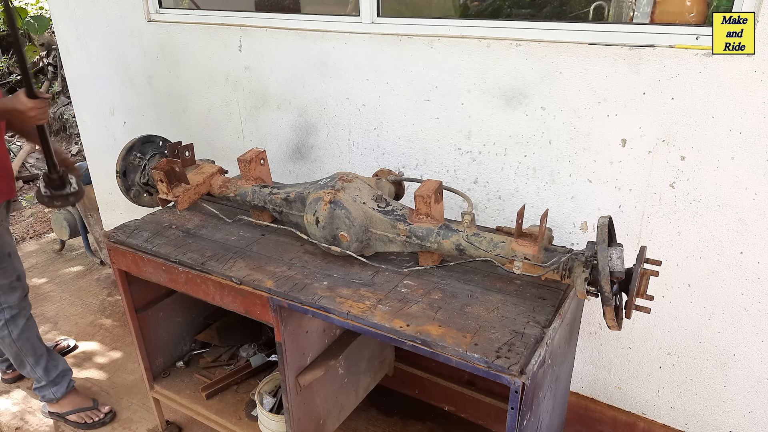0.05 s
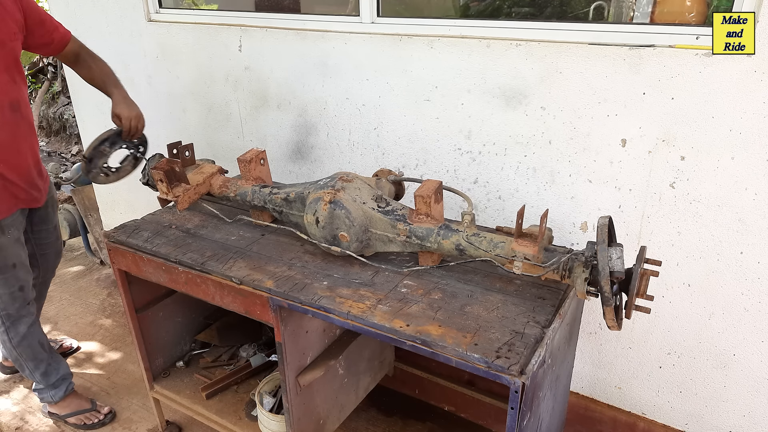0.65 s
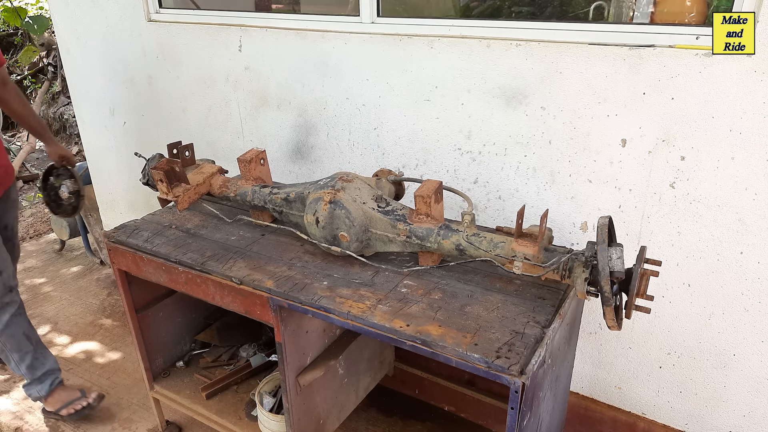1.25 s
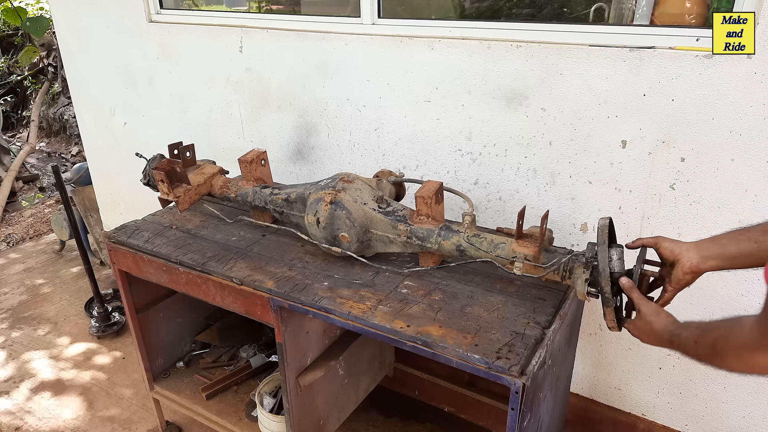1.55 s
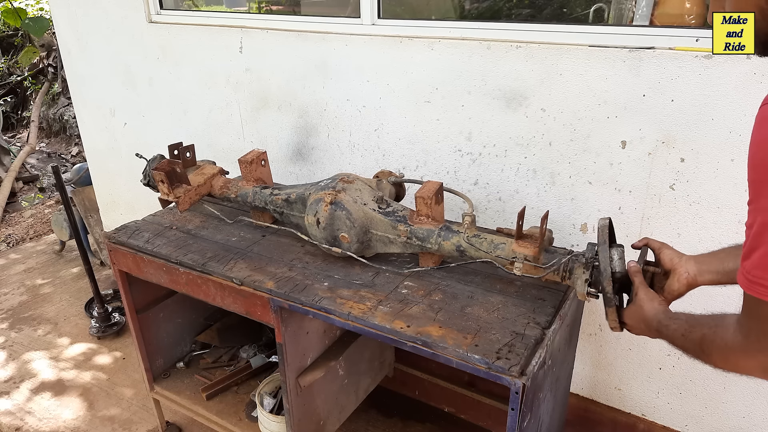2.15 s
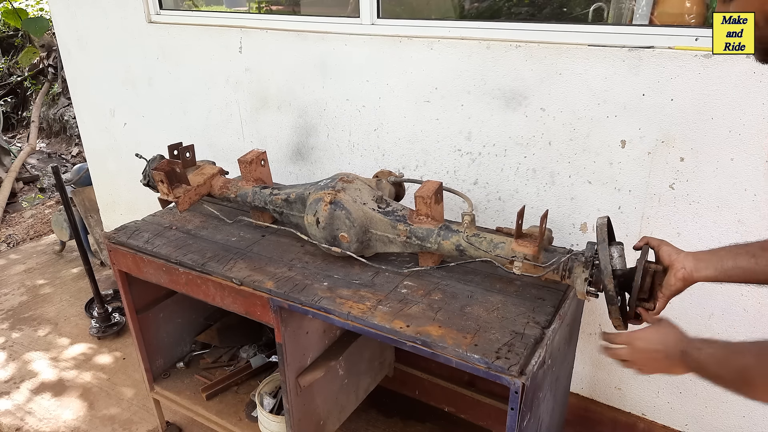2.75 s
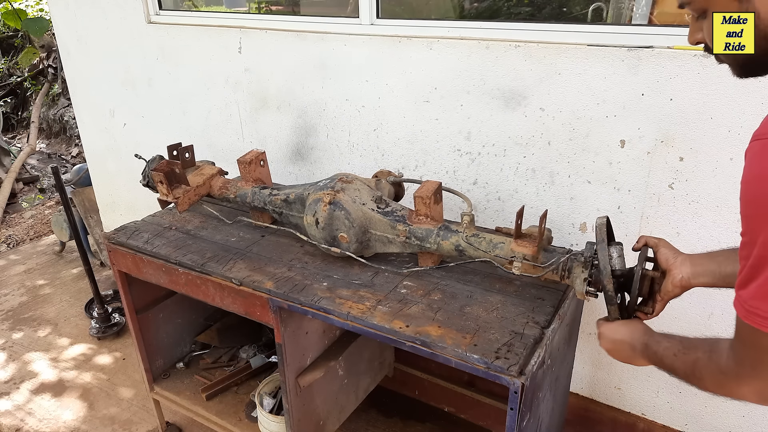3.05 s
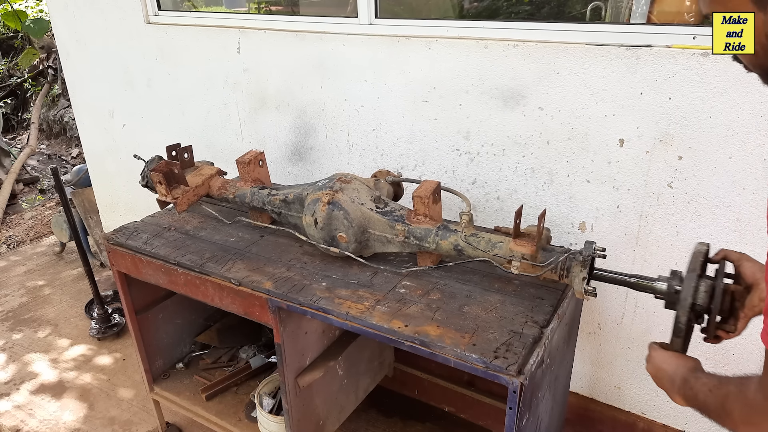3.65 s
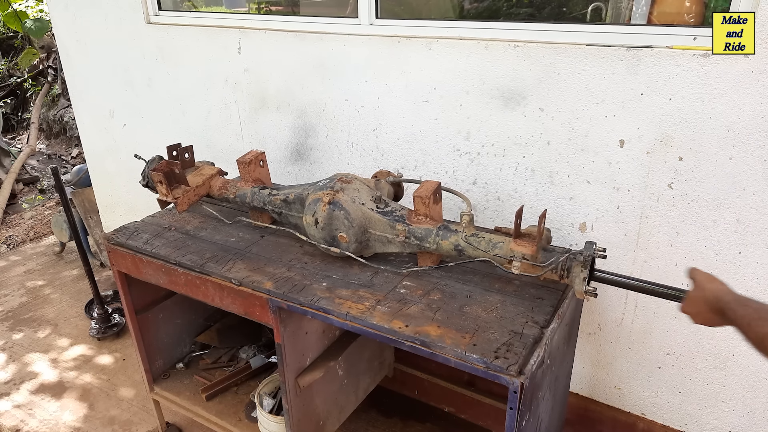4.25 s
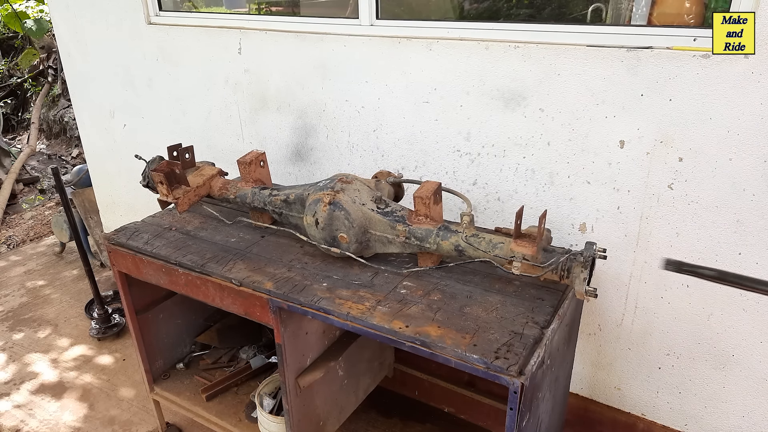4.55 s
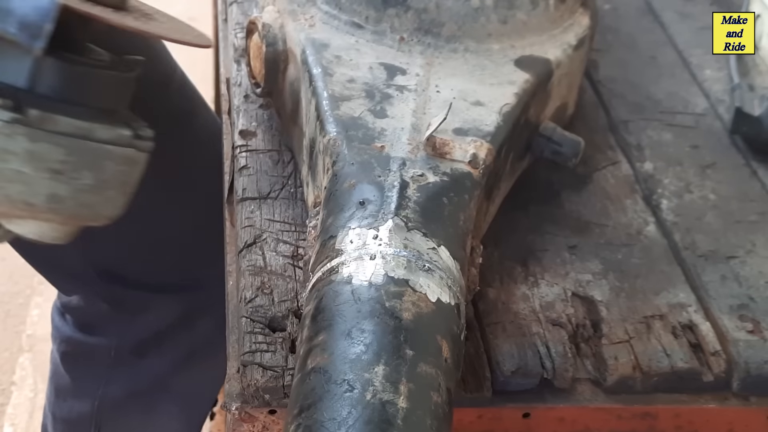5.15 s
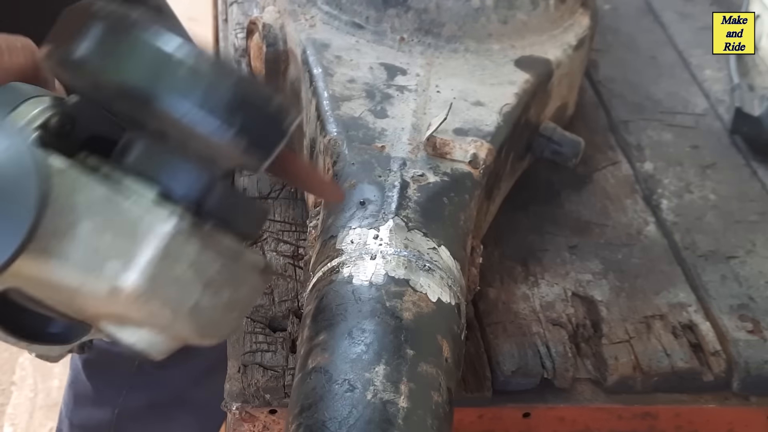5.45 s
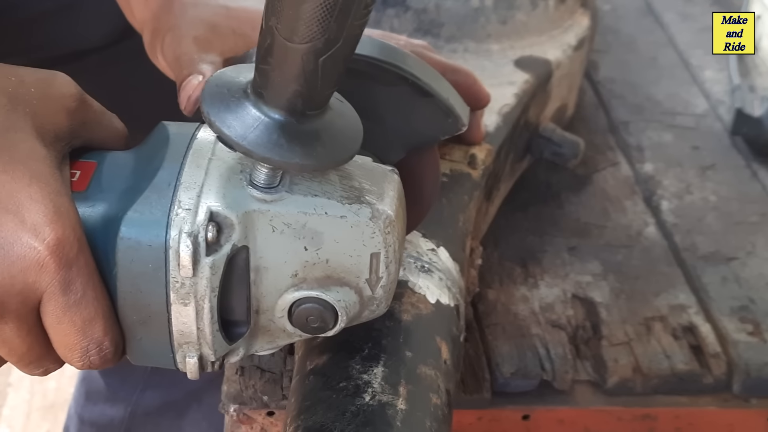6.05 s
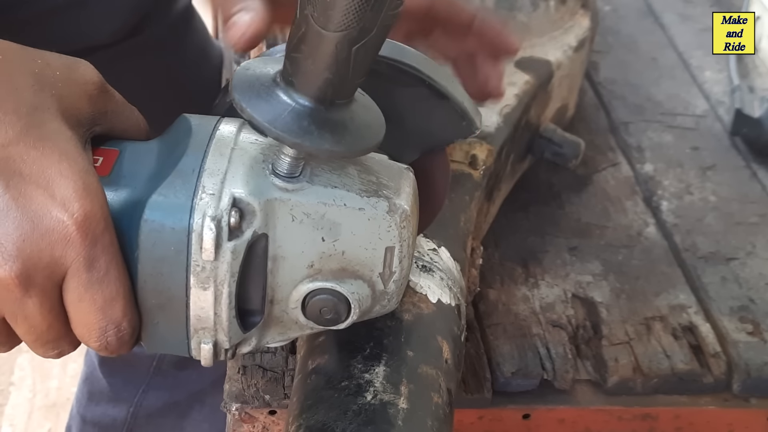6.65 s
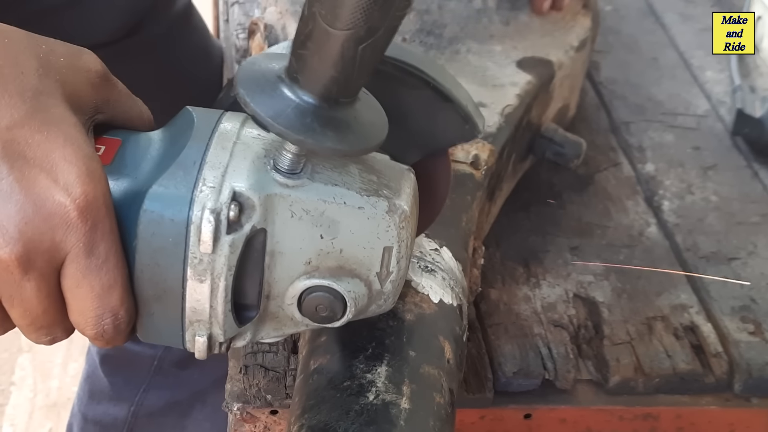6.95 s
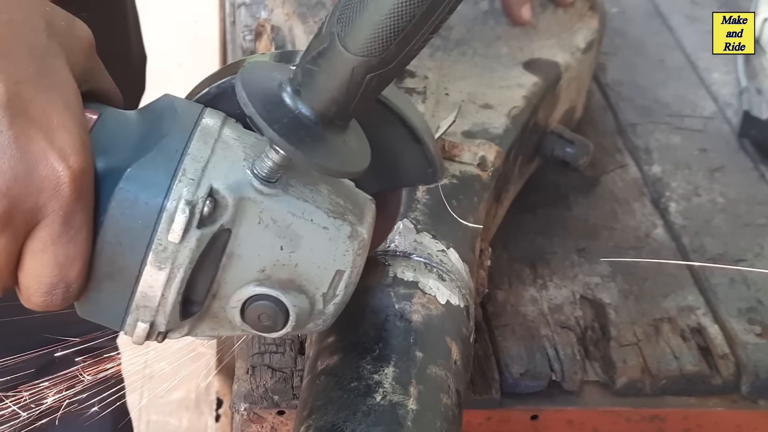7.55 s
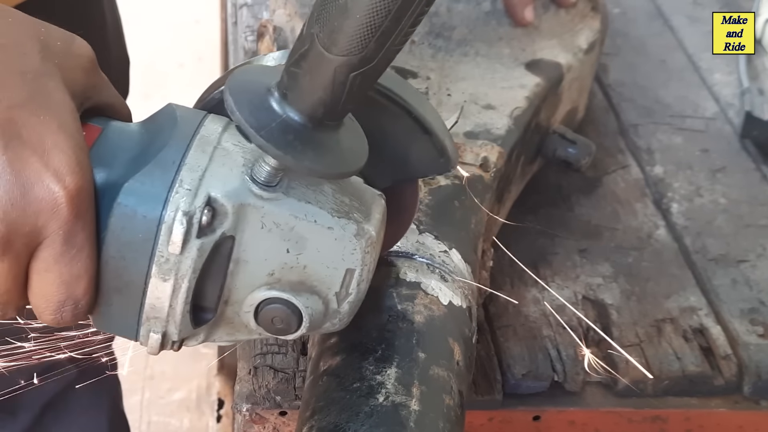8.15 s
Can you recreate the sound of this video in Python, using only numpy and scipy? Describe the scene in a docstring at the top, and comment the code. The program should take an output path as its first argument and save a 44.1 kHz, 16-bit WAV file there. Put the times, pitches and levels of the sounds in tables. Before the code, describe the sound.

Rusty steel parts clang and scrape outdoors while a bird squawks, then a close angle grinder spins up and screeches against steel.

```python
"""Over the hush and low hum of a yard, grit scuffs and a brake drum jolts off a rusty rear axle, ringing.
A bird starts squawking in the trees. Steel blows knock the half-shaft loose, clanging through the hollow
housing, and the shaft judders out along its tube. At five seconds the yard drops away and, close by, an
angle grinder spins up and runs free, fan rushing and gears whining. Its disc skips on the steel housing,
then bites and screeches in two squealing modes."""
import sys
import numpy as np
from scipy import signal
from scipy.fft import rfft, irfft, next_fast_len
from scipy.io import wavfile
from scipy.ndimage import map_coordinates

SR = 44100
rng = np.random.default_rng(int(sys.argv[2]) if len(sys.argv) > 2 else 0)


def bounce(signal):
    """Save signal as a 16-bit WAV file at the path given by the first command-line argument."""
    frames = np.transpose(np.atleast_2d(signal))
    limited = np.clip(frames, -1, 1)
    pcm = np.round(limited * 32767).astype(np.int16)
    wavfile.write(sys.argv[1], SR, pcm)


N = 370440

# colour of the yard air, the air at the bench and the grit: (frequency [Hz], density [dB])
YARD_AIR = [(25, -27), (55, -6.5), (100, -8.5), (145, -9), (200, -15.5), (463, -15), (1290, -23),
            (6000, -25.5), (12500, -35), (16000, -37)]
BENCH_AIR = [(25, -45), (110, -17), (1000, -42.5), (16000, -51.5)]
SCUFF_COLOUR = [(400, -11.5), (1500, -5.0), (6000, -7.5), (15000, -15.5)]
# low hum under the yard: (frequency [Hz], level [dB])
HUM_TONES = [(59.2, -56.5)]
# stereo image of air, blows and grinder: (frequency [Hz], left-right likeness [0-1])
AIR_IMAGE = [(240, 0.94), (950, 0.13), (4000, 0.039)]
BLOW_IMAGE = [(200, 1), (1000, 0.77), (5000, 0.099)]
TOOL_IMAGE = [(380, 0.99), (950, 0.46), (2400, 0.52), (6000, 0.097)]
# gritty scuffs: (time [s], length [s], level [dB])
SCUFF_STROKES = [(0.439, 0.0067, -48), (0.521, 0.025, -43), (0.971, 0.016, -52), (1.248, 0.37, -57.5),
                 (2.495, 0.33, -50.5), (3.222, 0.018, -34), (4.46, 0.0088, -56), (4.505, 0.15, -48),
                 (4.713, 0.056, -43.5)]

# the drum jolting off its studs, then a low thud and the blows on the axle, ahead of a common trim: (time [s],
# knock [dB], clang [dB], clink [dB], brightest ring [Hz])
DRUM_JOLTS = [(0.527, -22.5, -20.5, -32, 1210), (0.542, -29, -22.5, -27.5, 1500),
              (0.557, -24.5, -22.5, -36, 2250), (0.570, -34, -44, -33, 1000)]
AXLE_BLOWS = [(1.412, -40.5, -50.5, -53.5, 140), (1.970, -27, -29.5, -36, 1000),
              (2.274, -19.5, -13, -22.5, 1930), (2.39, -24.5, -24, -42, 1107),
              (2.454, -28, -28.5, -44.5, 900), (2.525, -33, -29, -34.5, 1490),
              (2.634, -32.5, -27.5, -37.5, 1110), (2.778, -36, -30, -45, 1010),
              (3.221, -26.5, -18, -27.5, 1093), (3.253, -22, -17, -14, 4360),
              (3.331, -36, -24.5, -36, 2800), (3.359, -28, -8.5, -11, 1920), (3.375, -25, -9, -17, 2596),
              (3.567, -21, -18, -33, 895), (3.593, -37, -29.5, -32.5, 2500), (4.075, -42, -44, -58, 1500)]
# ring of the brake drum and the backing plate: (frequency [Hz], relative level [dB], t60 [s])
DRUM_MODES = [(428, -8, 0.44), (495, -3, 0.38), (1062, -3.5, 0.11), (1500, 2, 0.045), (1825, -22, 0.35),
              (2114, -11, 0.13), (2487, -4, 0.069), (4880, -14, 0.03)]
PLATE_MODES = [(1026, -17, 0.11), (1295, -1, 0.24), (1830, 0, 0.37), (1856, -6, 0.16), (1950, 0, 0.22),
               (2420, 6.5, 0.11), (2460, -6, 0.39), (3230, -0.5, 0.19), (3734, -7.5, 0.068),
               (5616, 5, 0.112)]
# colour of a blow's dense ring, its opening crack and rubbed steel: (frequency [Hz], density [dB])
CLANK_COLOUR = [(41, -58), (70, -20.5), (145, -8), (500, -6.5), (892, -7.5), (1610, -11), (2500, -15),
                (5750, -25), (16000, -43)]
CRACK_COLOUR = [(300, -12.0), (2000, -8.0), (15000, -29.5)]
RUB_COLOUR = [(500, -3.5), (6000, -7.5)]
# decay of the dense ring: (frequency [Hz], t60 [s])
CLANK_DECAY = [(130, 0.42), (500, 0.31), (1500, 0.15), (8000, 0.13)]
# body of the hollow axle housing and the rubbed half-shaft: (frequency [Hz], width [Hz], gain [dB])
HOUSING_PEAKS = [(148.4, 22, 7.5), (478.5, 45, 4), (883, 40, -8), (2046, 13, -7.5)]
SHAFT_PEAKS = [(488, 52, 5), (563, 67, 2.5), (940, 87, 0), (1814, 90, -6.5), (3760, 33, -5),
               (5970, 50, -11.5)]
# bird calls: (time [s], length [s], starting pitch [Hz], level [dB])
BIRD_CALLS = [(1.62, 0.12, 2900, -70), (2.0, 0.087, 2780, -55), (2.895, 0.079, 2880, -51),
              (2.943, 0.13, 3075, -44.5), (3.007, 0.081, 3160, -43), (3.778, 0.12, 3265, -46.5),
              (4.619, 0.11, 3110, -45.5), (4.741, 0.13, 3020, -50)]
# the bird's voice: (harmonic [number], gain [dB])
BIRD_HARMONICS = [(1, -11.5), (2, -2.0), (3, -21.5), (4, -22.0)]
# pulls on the half-shaft: (time [s], length [s], level [dB])
SHAFT_PULLS = [(1.962, 0.041, -30), (2.247, 0.54, -34), (2.951, 0.069, -34.5), (3.195, 0.073, -26.5),
               (3.806, 0.076, -25), (3.943, 0.286, -40.5)]

# the gears take up their slack in two jerks: (time from the switch [s], gain [0-1])
GEAR_SLACK = [(-0.008, 0.0026), (-0.01, 0.25), (.001, 0.84), (0.02, 0.46), (0.0036, 1)]
# colour of the fan rush and the grinding grit: (frequency [Hz], density [dB])
FAN_COLOUR = [(35, -57), (60, -40), (136, -29), (822, -7.5), (1200, -8), (2050, -3), (2800, -.5),
              (5090, -5.5), (6140, -2.5), (10000, -7), (16000, -19)]
GRIT_COLOUR = [(200, 6.5), (15000, -1.5)]
# body of the gearcase and the sheet guard: (frequency [Hz], width [Hz], gain [dB])
GEARCASE_PEAKS = [(2006, 116, 3), (2870, 370, 1), (3900, 180, 6.5), (5570, 136, 8), (8150, 500, -11.5)]
GUARD_PEAKS = [(1314, 92, 6), (2180, 310, 3)]
# gear and bearing tones, each swelling as it sweeps through a resonance:
# (order [x disc speed], level [dB], resonance [Hz], width [Hz], roughness [rad])
GEAR_TONES = [(4.016, -38.5, 650, 380, 0.4), (8.1, -39, 1670, 110, 0.37), (26.9, -37.5, 5400, 230, 0.58),
              (29.6, -29.5, 6210, 210, 0.39), (36.5, -20, 4500, 1700, 5.7), (41.1, -33.5, 8300, 980, 0.69),
              (58.2, -31, 11430, 570, .8)]
# the close tool's balance: (frequency [Hz], left minus right [dB])
TOOL_BALANCE = [(150, 1), (380, -2), (950, 0), (2380, 2.5), (5980, 2), (15000, -16)]
# the disc skims, bites, then leans in: (time [s], settling [s], pressure [0-1], speed [turns/s])
DISC_CONTACTS = [(6.66, 0.28, 0.43, 202), (7.526, 0.015, 0.48, 205.4), (7.948, .45, 0.68, 203)]
# the lightly held disc skips on the steel: (time [s], level [dB])
DISC_SKIPS = [(6.876, -19.5), (6.961, -19.5), (7.011, -22), (7.053, -19), (7.1, -19.5), (7.15, -21.5),
              (7.198, -18.5), (7.25, -23.5), (7.293, -19.5), (7.35, -19), (7.402, -18.5), (7.433, -25.5),
              (7.453, -16.5)]
# ring of the disc skipping and grinding on the housing: (frequency [Hz], width [Hz], gain [dB])
SKIP_PEAKS = [(3050, 400, -5.5), (4290, 280, 1.5), (5560, 420, -6)]
GRIND_PEAKS = [(288, 68, -19), (993, 423, -19.5), (4050, 800, -6.5), (5780, 260, -7)]
# the disc's two squealing modes: (frequency [Hz], width [Hz])
SQUEAL_MODES = [(2975, 170), (4216, 130)]
# how strongly each squeals: (time [s], lower mode [dB], upper mode [dB])
SQUEAL_LEVELS = [(7.526, -37, -24.5), (7.58, -33, -21), (7.65, -27, -22.5), (7.79, -25.5, -27),
                 (7.92, -24.5, -22), (8.01, -32, -29), (8.055, -25.5, -21), (8.10, -30.5, -31),
                 (8.4, -30, -31)]
# gears under load: (order [x disc speed], level [dB])
GROAN_TONES = [(3.76, -47), (7.519, -46.5)]

CLOSE_S, SWITCH_S = 5.0, 5.328  # the cut to the bench; the grinder switches on
FREE_SPEED, KICK_SPEED = 211, 96  # disc turns a second: running free, just after the switch


def amp(db):
    """Decibels to gain."""
    return 10 ** (np.asarray(db) / 20)


def unit(x):
    """x at rms 1."""
    return x / np.sqrt(np.mean(x ** 2) + 1e-20)


def along(points, hz):
    """(Hz, value) points read on a log axis."""
    f, v = np.transpose(points)
    return np.interp(np.log(hz + 1), np.log(f + 1), v)


def clock():
    """The time of every sample."""
    return np.arange(N) / SR


def wobble(rate):
    """A smooth random curve, rate knots a second."""
    return map_coordinates(rng.standard_normal(int(N * rate / SR) + 4), [np.arange(N) * rate / SR])


def filtered(x, response):
    """x times a complex response of frequency."""
    n = x.shape[-1]
    m = next_fast_len(n + 8192)
    return irfft(rfft(x, m) * response(np.fft.rfftfreq(m, 1 / SR)), m)[..., :n]


def resonate(x, peaks):
    """x through (Hz, width, dB) resonances of alternating polarity."""
    return filtered(x, lambda f: sum((-1) ** k * amp(db) * 1j * f * w / (c * c - f * f + 1j * f * w)
                                     for k, (c, w, db) in enumerate(peaks)))


def band(x, lo_hz, hi_hz):
    """Causal band-pass."""
    return signal.sosfilt(signal.butter(3, [lo_hz, hi_hz], 'band', fs=SR, output='sos'), x)


def noise(colour, image, size=N):
    """Coloured stereo noise of rms 1."""
    def mid_side(hz):
        spread = np.arccos(along(image, hz)) / 2
        return amp(along(colour, hz)) * [np.cos(spread), np.sin(spread)]
    mid, side = filtered(rng.standard_normal((2, size)), mid_side)
    return unit(np.array([mid + side, mid - side]))


def pan(db):
    """Channel gains for a left minus right level."""
    return amp([[db / 2], [-db / 2]])


def echo(x, t60, wet_db):
    """x with a diffuse tail from walls and trees."""
    t = np.arange(SR) / SR
    tail = rng.standard_normal((2, SR)) * amp(-60 * t / t60)
    wet = signal.fftconvolve(np.atleast_2d(x), tail / np.linalg.norm(tail[0]), axes=1)[:, :N]
    return x + amp(wet_db) * wet


def nearby(x, t60, wet_db):
    """Bench top, housing and hands reflect within milliseconds and comb the sound."""
    t = np.arange(SR // 40) / SR
    paths = rng.standard_normal((2, len(t))) * amp(-60 * t / t60) * (t > .001)
    wet = signal.fftconvolve(x, paths / np.linalg.norm(paths[0]), axes=1)[:, :N]
    return (x + amp(wet_db) * wet) / np.hypot(1, amp(wet_db))


def air():
    """The bed: open-air hush with a low hum, giving way to quieter air at the bench."""
    t = clock()
    far = np.clip((CLOSE_S - t) / 0.0203, 0, 1)
    hum = sum(amp(db + 0.62 * wobble(5.2)) * np.sqrt(2) * np.sin(2 * np.pi * hz * t + 0.27 * wobble(5))
              for hz, db in HUM_TONES)
    yard = amp(-50 - 3.0 + 2.65 * wobble(3.1)) * noise(YARD_AIR, AIR_IMAGE) * pan(-5.0)
    return far * (yard + hum) + (1 - far) * amp(-57.0) * noise(BENCH_AIR, AIR_IMAGE)


def scuffs():
    """Grit rubbed in short strokes."""
    strokes = sum(amp(db) * np.exp(-(2 * (clock() - s) / length) ** 2) for s, length, db in SCUFF_STROKES)
    return strokes * unit(noise(SCUFF_COLOUR, AIR_IMAGE) * amp(3.9 * wobble(300)))


def clank(modes, ring_db, hollow_db, bright_hz):
    """One blow: a crack, a dense, quickly dying ring, the hollow housing and the part's clear modes."""
    t = np.arange(SR // 2) / SR
    # the point of contact favours one part of the ring
    focus_db = lambda f: 9.5 * np.exp(-(np.log2((f + 1) / bright_hz) / 0.41) ** 2)
    modes = [(f, db + focus_db(f), t60) for f, db, t60 in modes]
    hz, age, frames = signal.stft(noise(CLANK_COLOUR, BLOW_IMAGE, size=len(t)), SR, nperseg=256)
    decay = amp(focus_db(hz)[:, None] / 2 - 60 * age / along(CLANK_DECAY, hz)[:, None])
    dense = unit(signal.istft(frames * decay, SR)[1][:, :len(t)])
    ring = sum(amp(db + rng.normal(0, 1.0, (2, 1)) - 60 * t / t60)
               * np.sin(2 * np.pi * f * t + rng.uniform(0, 2 * np.pi)) for f, db, t60 in modes)
    # the loose part buzzes against its neighbour, which roughens each mode
    buzz = unit(resonate(dense, [(f, 70, db / 2 - along(CLANK_COLOUR, f)) for f, db, _ in modes]))
    steel = amp(ring_db) * (unit(ring) + amp(-6.0) * buzz)
    crack = amp(11.5) * np.exp(-t / 0.0026) * noise(CRACK_COLOUR, BLOW_IMAGE, size=len(t))
    hollow = amp(hollow_db) * unit(resonate(dense, HOUSING_PEAKS))
    return (crack + dense + steel + hollow) * (1 - np.exp(-t / 0.00012))


def blows(events, modes, ring_db, hollow_db, top_hz, heavy_db=-10.5, trim_db=-5.0):
    """Steel knocks on steel; each contact has its own blend of low knock, mid clang and high clink."""
    out = np.zeros((2, N + SR))
    for s, knock_db, clang_db, clink_db, bright_hz in events:
        woken_db = np.clip(clang_db - heavy_db, -15.5, 0)  # heavy blows wake the modes fully
        hit = clank(modes, ring_db + woken_db, hollow_db, bright_hz)
        layers = [(knock_db, 85, 700, 0.5), (clang_db, 700, 3500, -5), (clink_db, 3500, top_hz, -5)]
        for db, lo_hz, hi_hz, side_db in layers:
            layer = band(hit, lo_hz, hi_hz) * pan(side_db)
            attack_rms = layer[:, :SR // 40].std()
            out[:, round(s * SR):][:, :hit.shape[1]] += amp(db + trim_db) * layer / attack_rms
    return out[:, :N]


def bird(fall_hz_per_s=6500):
    """Hoarse falling squawks in the trees, strongest on the second harmonic."""
    t, out = clock(), np.zeros(N)
    hoarse = 1 + .028 * wobble(900) + .015 * wobble(90)
    for s, length, first_hz, db in BIRD_CALLS:
        on = (t > s) & (t < s + length)
        age = t[on] - s
        phase = 2 * np.pi * np.cumsum((first_hz - fall_hz_per_s * age) * hoarse[on]) / SR
        voice = sum(amp(level) * np.sin(k * phase) for k, level in BIRD_HARMONICS)
        out[on] += amp(db) * np.sin(np.pi * age / length) ** .5 * voice
    return echo(out, t60=0.503, wet_db=4.0)


def pulling(attack_s=0.021, release_s=0.036, tire_db_per_s=3):
    """Envelope of the rubbing: each pull takes hold, tires slowly and lets go."""
    effort = np.full(N, amp(-44.5))  # the shaft creeps between pulls
    for s, length, db in SHAFT_PULLS:
        age = np.maximum(clock() - s, 0)
        shape = np.minimum(age / attack_s, 1) * np.exp(-np.maximum(age - length, 0) / release_s)
        effort = np.maximum(effort, shape * amp(db - tire_db_per_s * age))
    return effort


def half_shaft():
    """The splined shaft judders along its tube and rings more freely the farther it is out."""
    catches = amp(4.5 * wobble(35))
    slips = noise(CLANK_COLOUR, BLOW_IMAGE) * catches
    tube = unit(unit(resonate(slips, HOUSING_PEAKS)) + unit(slips))
    rub = noise(RUB_COLOUR, BLOW_IMAGE) * amp(2.6 * wobble(70) + 4.6 * wobble(18))
    shaft = unit(resonate(rub, SHAFT_PEAKS))
    drawn = np.interp(clock(), [3.6, 4.1], [.25, .9])
    moving = np.interp(clock(), [1.96, 2, 4.28, 4.36], [0, 1, 1, 0])
    return moving * pulling() * pan(-1.1) * ((1 - drawn) * tube + drawn * shaft)


def drive(spin_up_s=.17, settle_s=.33, slow_share=.33, inertia_s=.06):
    """Disc speed and pressure: the motor runs up to its free speed, and contact drags it down."""
    t, pressure, aim = clock(), np.zeros(N), np.full(N, float(FREE_SPEED))
    for s, ramp_s, firmness, loaded_speed in DISC_CONTACTS:
        on = np.clip((t - s) / ramp_s, 0, 1)
        pressure += on * (firmness - pressure)
        aim += on * (loaded_speed - aim)
    lag = np.exp(-1 / (inertia_s * SR))  # the speed lags behind the load
    sag = signal.lfilter([1 - lag], [1, -lag], FREE_SPEED - aim)
    age = np.maximum(t - SWITCH_S, 0)
    shortfall = (1 - slow_share) * np.exp(-age / spin_up_s) + slow_share * np.exp(-age / settle_s)
    return FREE_SPEED - (FREE_SPEED - KICK_SPEED) * shortfall - sag, pressure


def grinder(first_gain=0.29, build_s=0.067):
    """Motor and disc share one speed; so close up, the tool has a different colour on each side."""
    speed, pressure = drive()
    turns = np.cumsum(speed * (1 + 0.00069 * wobble(40))) / SR
    age = clock() - SWITCH_S
    slack = np.interp(age, *np.transpose(GEAR_SLACK))
    swell = slack * (1 - (1 - first_gain) * np.exp(-np.maximum(age, 0) / build_s))
    sides = lambda hz: amp(np.outer([.5, -.5], along(TOOL_BALANCE, hz)))
    tool = motor(turns, speed, pressure) + (disc(turns, pressure) + screech(turns, speed)) * pan(2.9)
    return swell * filtered(tool, lambda hz: sides(hz) / np.sqrt(np.mean(sides(hz) ** 2, axis=0)))


def motor(turns, speed, pressure):
    """Fan rush and gear rattle, a whirr that repeats every turn, the shaking guard and the whine."""
    strain = np.exp(-np.abs(clock() - SWITCH_S) / 0.25)  # starting torque slams teeth and guard
    one_turn = irfft(np.exp(2j * np.pi * rng.random(65)), 512)
    looped = np.interp(turns, np.arange(512) / 512, one_turn, period=1)
    whirr = unit(filtered(looped, lambda hz: amp(along(FAN_COLOUR, hz))))
    fan = unit(noise(FAN_COLOUR, TOOL_IMAGE) * amp((1.65 + 2.0 * strain) * wobble(1400)))
    flow = nearby(fan + amp(-12.5 + 3 * strain) * whirr, t60=0.032, wet_db=-4.5)
    flow += amp(-8.0) * unit(resonate(noise(FAN_COLOUR, TOOL_IMAGE), GEARCASE_PEAKS))
    body = filtered(flow, lambda hz: 1 / (1 + (hz / 5500) ** 4))
    fizz = flow - body
    rush = amp(1.5 * strain - 2.5 * pressure) * (amp(-23) * unit(body) + amp(-24.5) * unit(fizz))
    # the guard rattles on until the steel steadies the tool
    shaken = amp(-27) * strain + amp(-35) * np.maximum(1 - 2 * pressure, 0)
    guard = shaken * unit(resonate(noise(FAN_COLOUR, TOOL_IMAGE) * amp(3.9 * wobble(55)), GUARD_PEAKS))
    return rush + guard + whine(turns, speed, pressure)


def whine(turns, speed, pressure):
    """Gear and bearing tones swell through their resonances; the load damps the high ones most."""
    out = np.zeros((2, N))
    for order, db, hz, width, rough in GEAR_TONES:
        swell = 1 / (1 + (2 * (order * speed - hz) / width) ** 2)
        level = swell * amp(db - pressure * order / 2 + 1.9 * np.array([wobble(10), wobble(16)]))
        out += level * np.sin(2 * np.pi * order * turns + rough * wobble(300))
    return amp(-10.5 * pressure) * out


def disc(turns, pressure, skip_s=0.018):
    """The disc's high spot hits the steel every turn; a light touch skips off, a firm one grinds on."""
    turn_starts = np.flatnonzero(np.diff(np.floor(turns)))
    strikes = np.bincount(turn_starts, amp(rng.normal(0, 3.1, len(turn_starts))), N)
    grit = noise(GRIT_COLOUR, TOOL_IMAGE) * amp(3.5 * np.cos(2 * np.pi * turns))
    scrape = lambda peaks: unit(unit(resonate(strikes, peaks)) + amp(6.0) * unit(resonate(grit, peaks)))
    skips = sum(amp(db) * np.exp(-(2 * (clock() - s) / skip_s) ** 2) for s, db in DISC_SKIPS)
    return skips * scrape(SKIP_PEAKS) + amp(-22.5) * pressure * scrape(GRIND_PEAKS)


def screech(turns, speed, attack_s=.008):
    """The biting disc locks onto multiples of its speed near its two modes; grit rasps, gears groan."""
    def tone(order):
        flutter = amp(2.5 * wobble(18))
        return flutter * np.sin(2 * np.pi * order * turns + .45 * wobble(45) + .3 * wobble(500))
    times, *levels = np.transpose(SQUEAL_LEVELS)
    loaded_speed = speed[round(times[0] * SR):].mean()
    out = sum(amp(db) * tone(order) for order, db in GROAN_TONES)
    for (hz, width), db in zip(SQUEAL_MODES, levels):
        orders = int(hz / FREE_SPEED) + np.arange(-1, 3)
        locked = unit(sum(tone(k) / (1 + (2 * (k * loaded_speed - hz) / width) ** 2) for k in orders))
        rasp = unit(resonate(rng.standard_normal((2, N)), [(hz, 2 * width, 0)]))
        out = out + amp(np.interp(clock(), times, db)) * unit(locked + amp(-7) * rasp)
    return out * np.clip((clock() - times[0]) / attack_s, 0, 1)


def scene():
    """The axle work in the yard, a little to the right, then the grinder up close."""
    drum = blows(DRUM_JOLTS, DRUM_MODES, ring_db=12.0, hollow_db=-4.0, top_hz=7950)
    axle = blows(AXLE_BLOWS, PLATE_MODES, ring_db=1.5, hollow_db=7.0, top_hz=15000) + half_shaft()
    # the right side hears the work 0.1 ms sooner
    work = filtered(drum + axle, lambda hz: np.exp(np.outer([-1, 1], 1j * np.pi * hz * 1e-4)))
    yard = echo(work, t60=0.43, wet_db=-12.5) + (scuffs() + bird()) * pan(-10.5)
    return yard * np.clip((CLOSE_S - clock()) / 0.023, 0, 1) + air() + grinder()


def record(dry):
    """Master EQ: thin the bass below 33 Hz and cut everything above 16 kHz."""
    return filtered(dry, lambda hz: hz ** 2 / np.hypot(hz ** 2, 33 ** 2) * (hz < 16000))


dry = scene()
out = record(dry)
bounce(out)
```